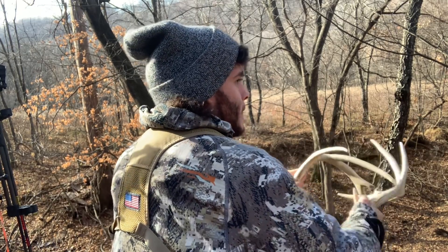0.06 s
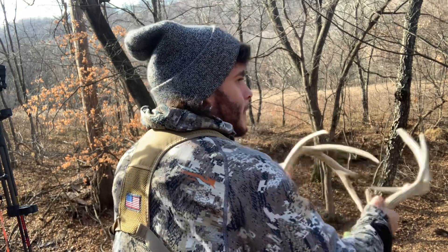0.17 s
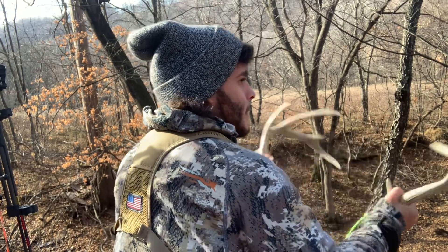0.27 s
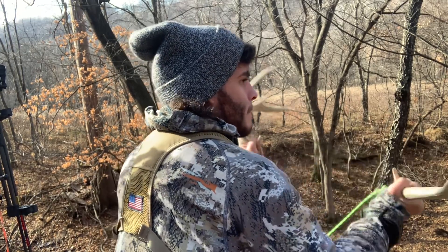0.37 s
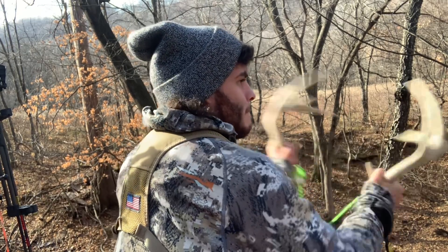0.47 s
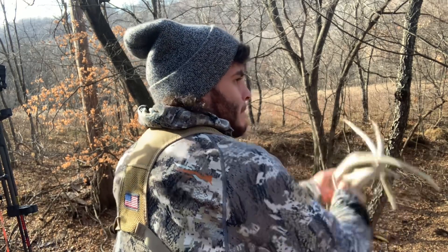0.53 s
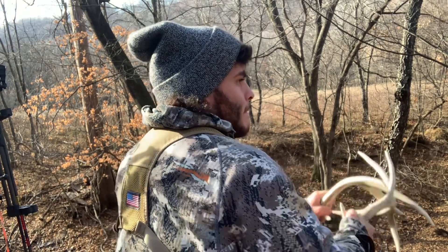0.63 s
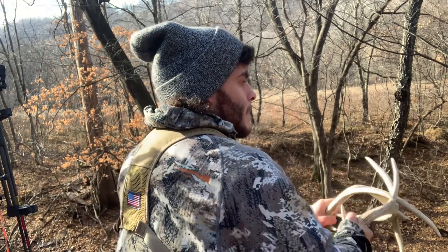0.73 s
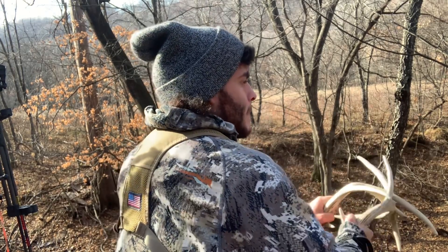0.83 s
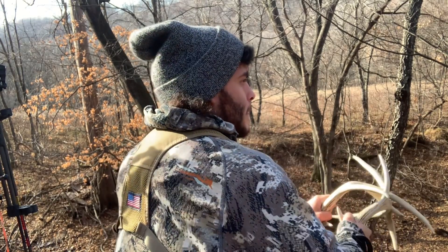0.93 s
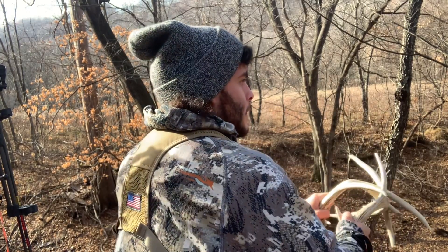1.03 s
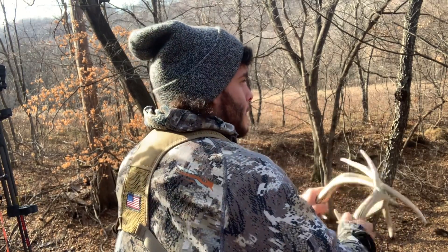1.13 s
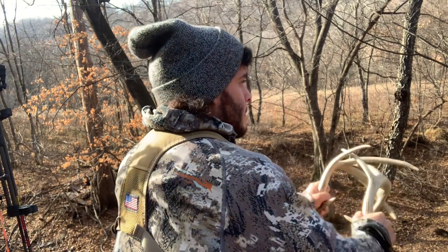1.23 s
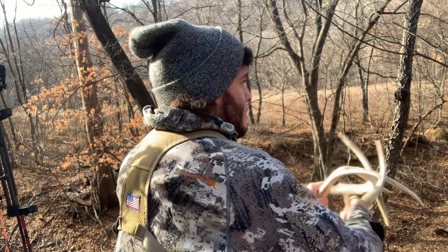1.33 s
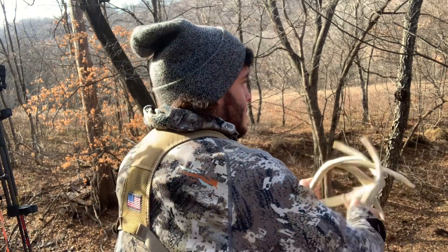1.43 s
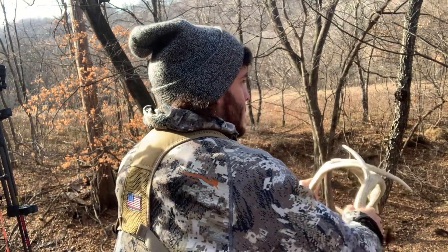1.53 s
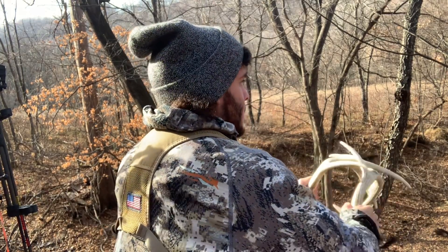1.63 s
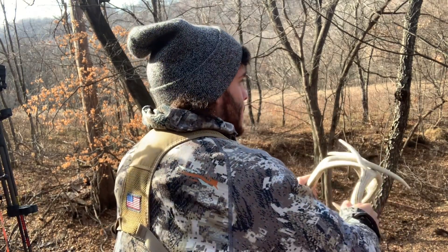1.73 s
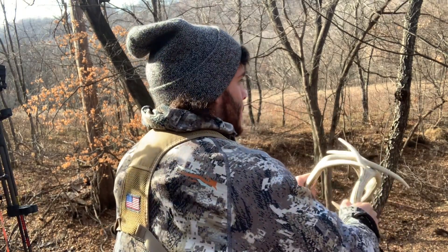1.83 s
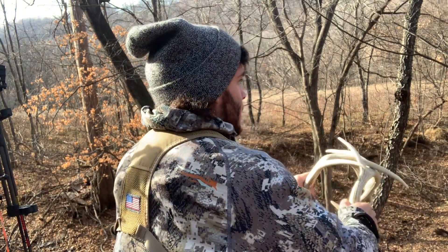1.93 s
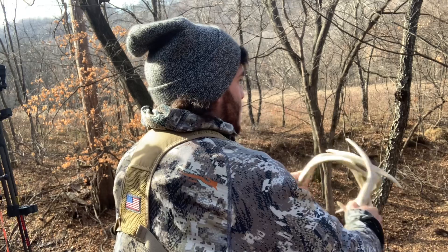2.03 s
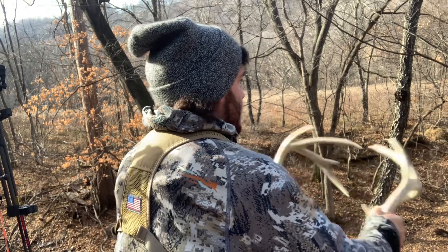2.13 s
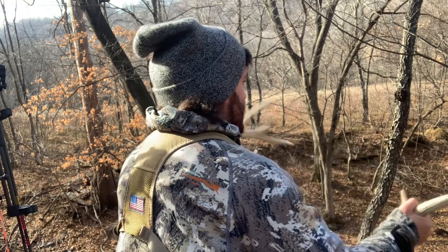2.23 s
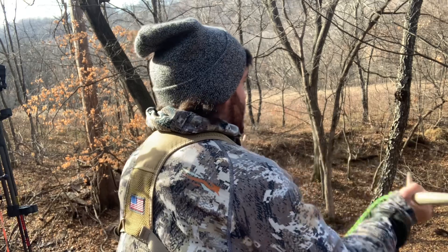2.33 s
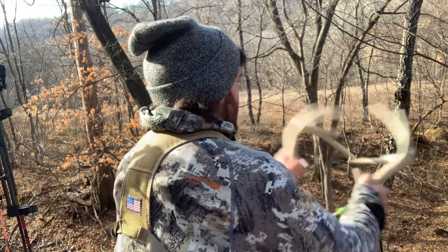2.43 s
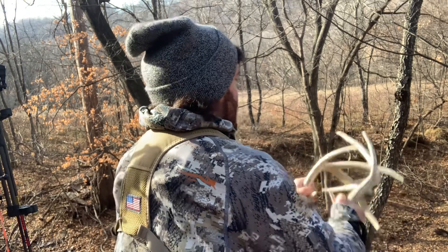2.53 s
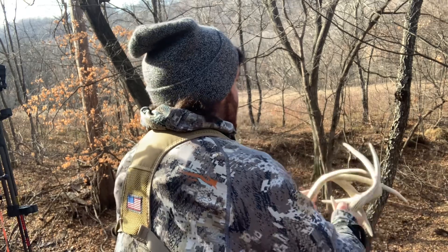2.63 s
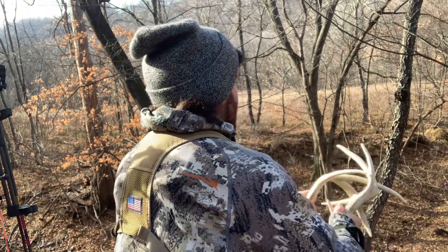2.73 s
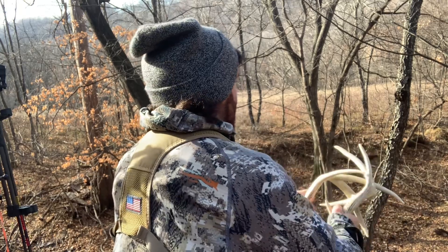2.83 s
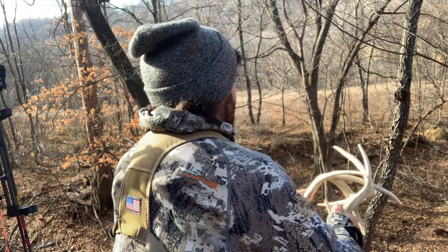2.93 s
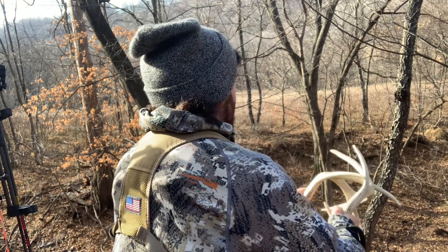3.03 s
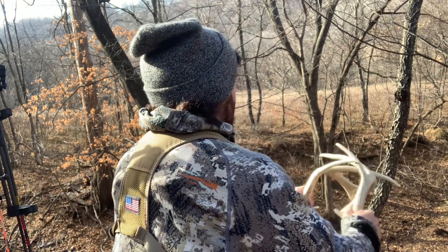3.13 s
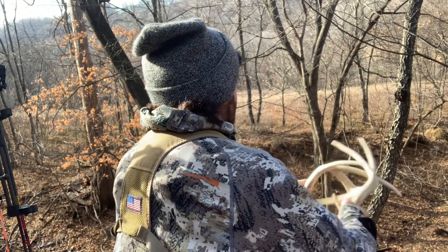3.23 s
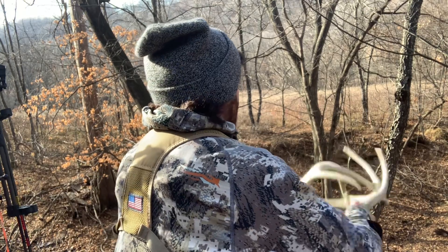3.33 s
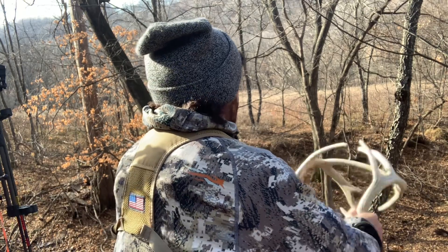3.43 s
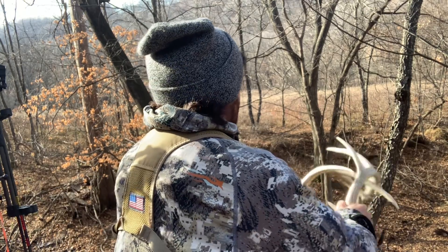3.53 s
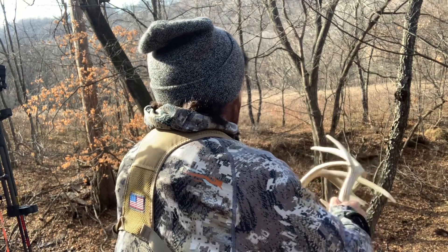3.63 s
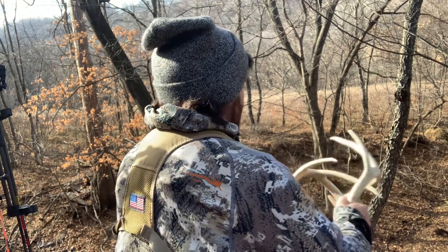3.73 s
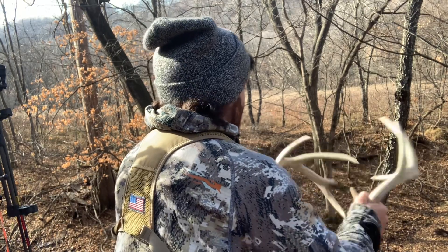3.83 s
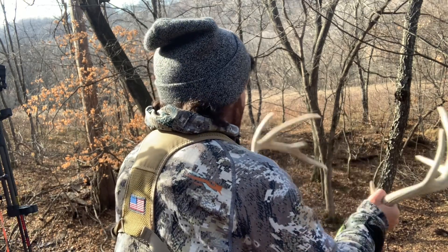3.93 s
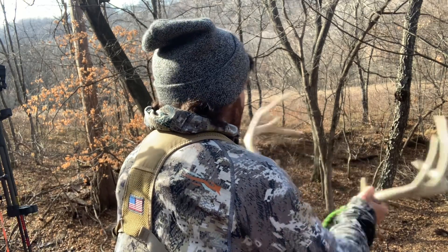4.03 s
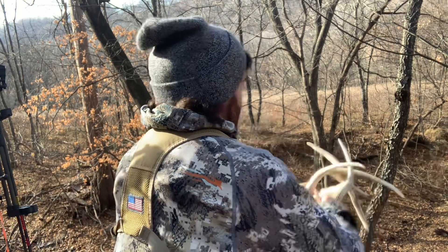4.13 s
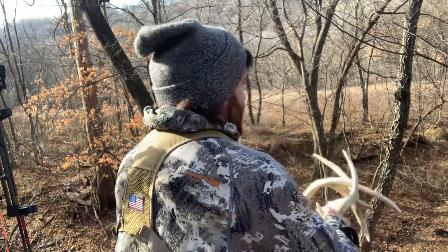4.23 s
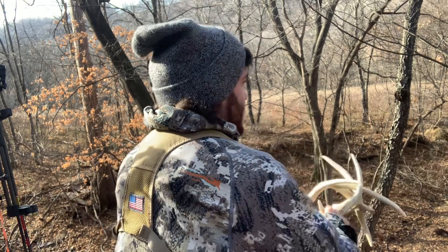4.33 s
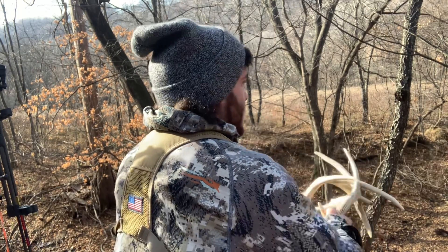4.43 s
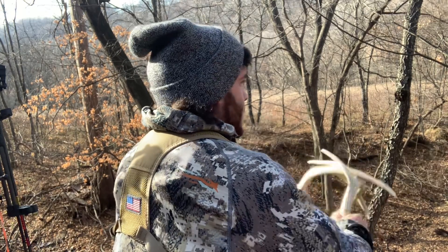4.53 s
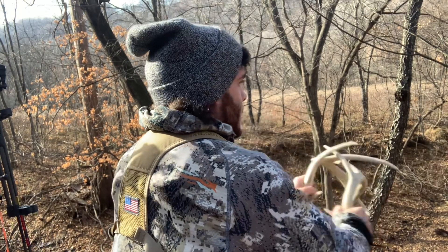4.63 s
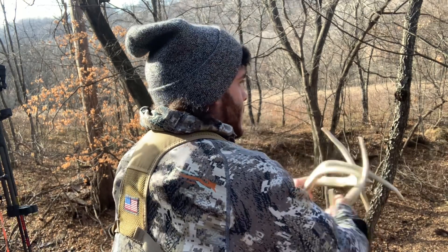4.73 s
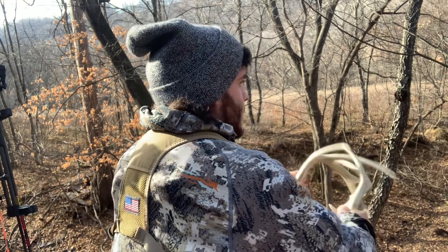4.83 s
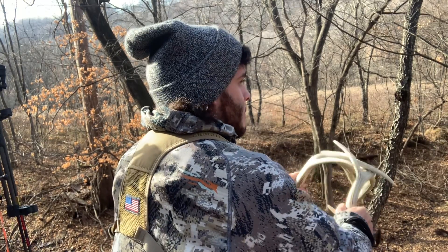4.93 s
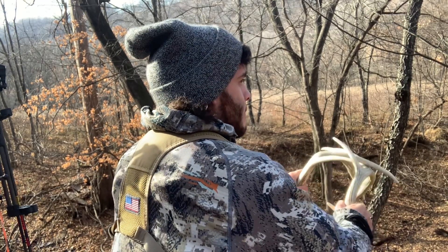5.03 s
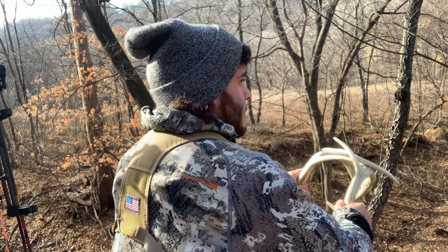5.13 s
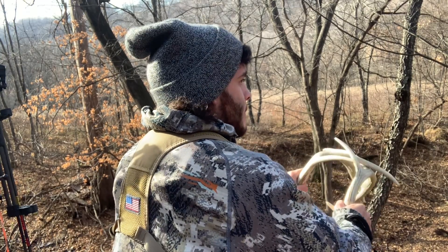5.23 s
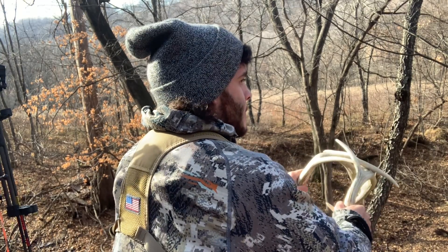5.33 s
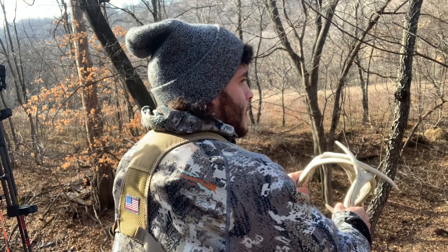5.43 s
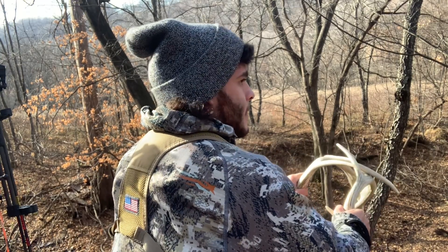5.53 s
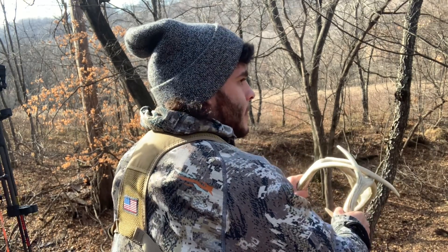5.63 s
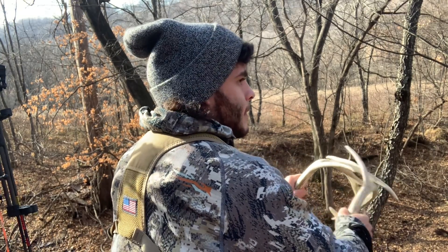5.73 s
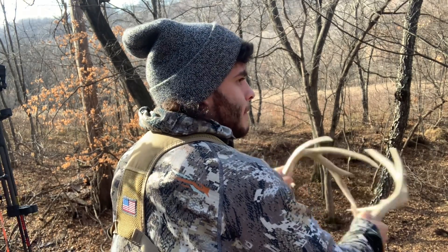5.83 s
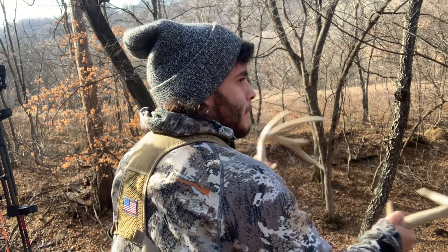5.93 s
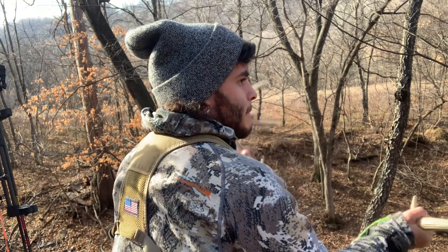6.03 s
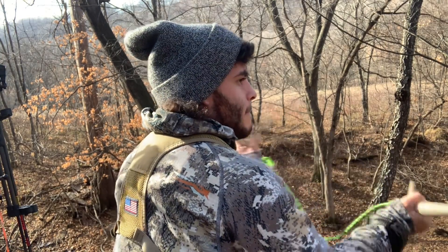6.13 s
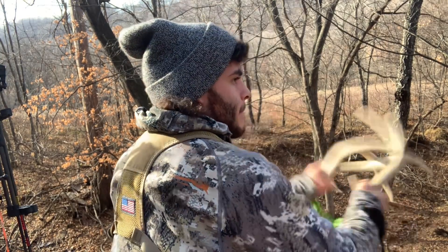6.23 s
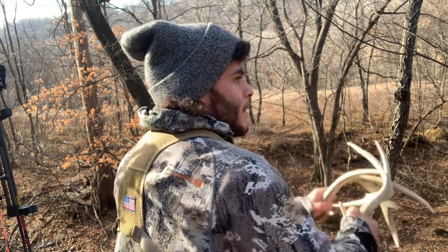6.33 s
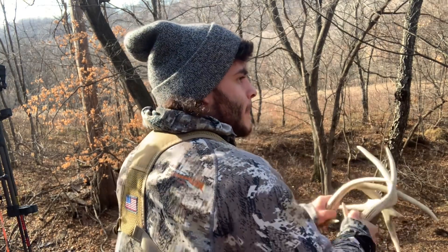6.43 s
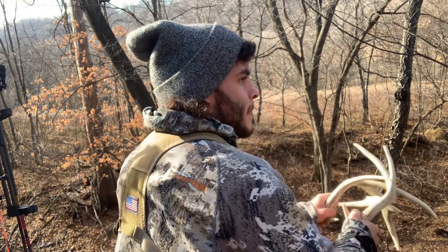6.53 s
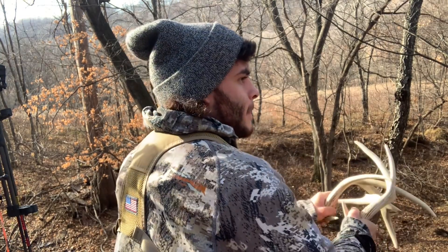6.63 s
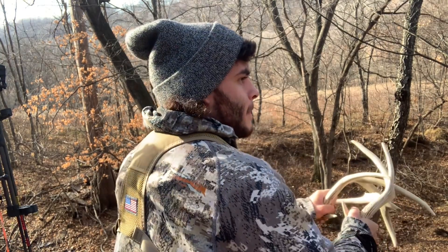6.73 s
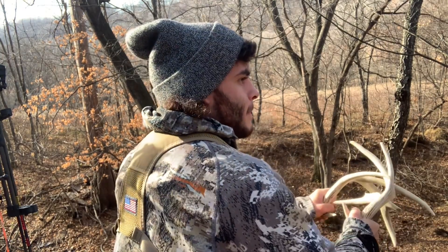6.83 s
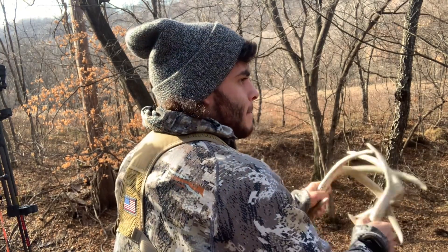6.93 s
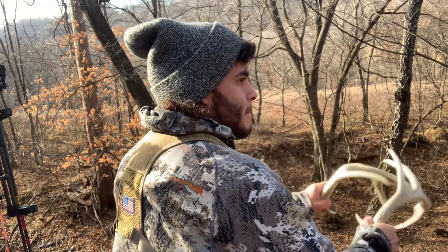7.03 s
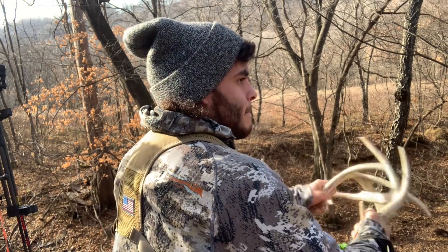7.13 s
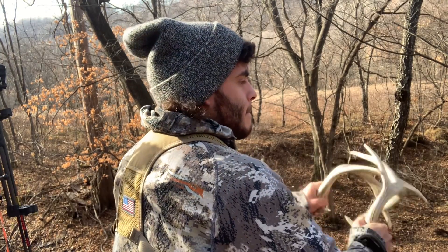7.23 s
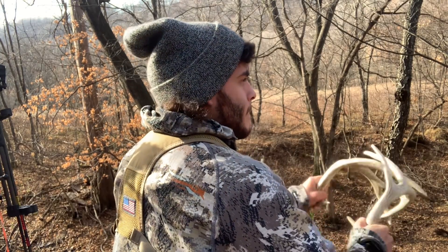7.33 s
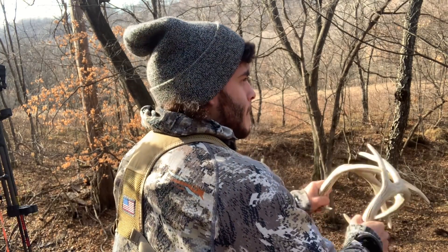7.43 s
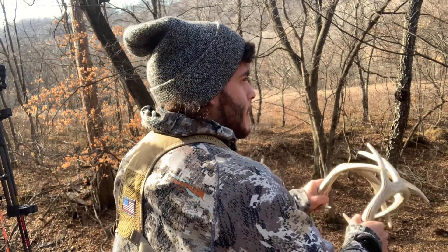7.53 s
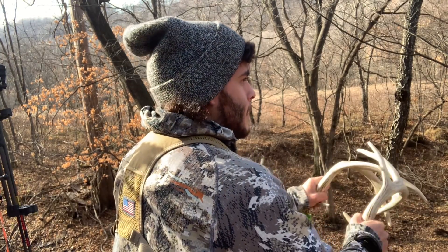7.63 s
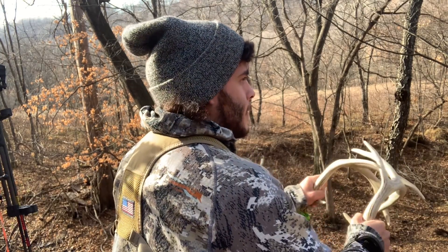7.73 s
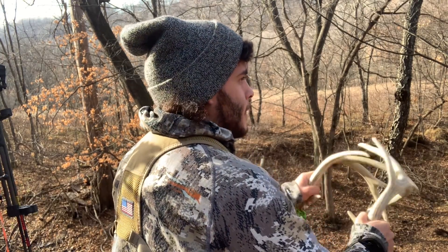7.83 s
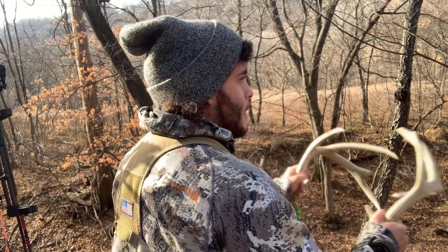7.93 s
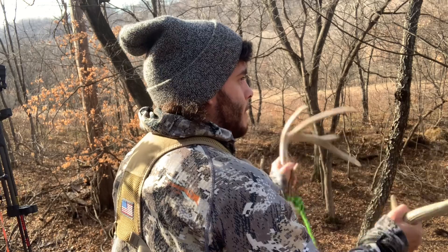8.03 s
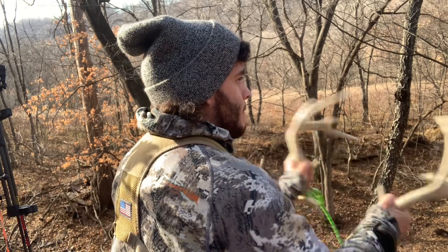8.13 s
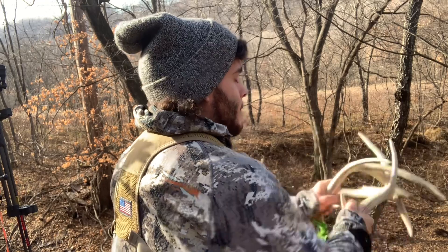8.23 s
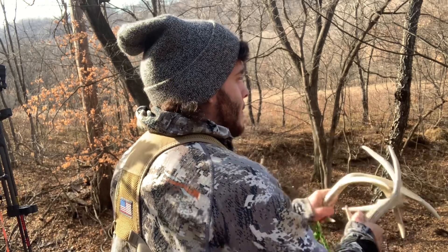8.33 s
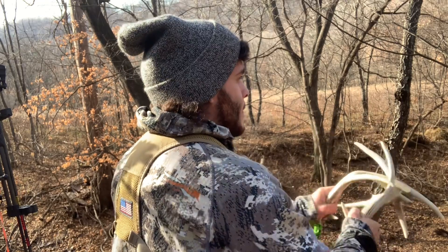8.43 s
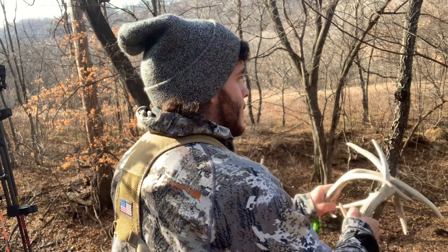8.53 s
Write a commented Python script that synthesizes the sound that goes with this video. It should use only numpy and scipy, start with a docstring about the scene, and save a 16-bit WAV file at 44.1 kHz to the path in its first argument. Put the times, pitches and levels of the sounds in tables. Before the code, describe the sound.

Close up in quiet leafless woods, a pair of deer antlers is clashed five times, about two seconds apart. Each clash is a sudden loud bony crack with a bright click and short hollow body. Between clashes come much softer scattered knocks, ticks and brief scrapes as the tines twist together. A thin grainy echo comes off the trunks, over low wind rumble and faint hiss.

```python
"""Two deer antlers are clashed, then twisted and knocked together, in five bouts in bare woodland.
Before each clash a low noise rises, to fade after it; tips meet, beams crash and boom, forks lock.
Then knocks ring damped beams and tines and skid on rough bone, and tines scrape; the fourth bout has a squeak.
Trunks scatter the clatter back as decaying noise; coloured noise makes the low swells, wind and hiss.
Two close microphone ports behind the hands hear it all, through a limiter."""
import sys
import numpy as np
from scipy import signal
from scipy.fft import rfft, irfft, next_fast_len
from scipy.io import wavfile
from scipy.ndimage import uniform_filter1d, minimum_filter1d

SR = 44100
rng = np.random.default_rng(int(sys.argv[2]) if len(sys.argv) > 2 else 0)


def waveform_to_disk(signal):
    """Save audio, clipped to [-1, 1], as 16-bit WAV at the path in sys.argv[1]."""
    frames = np.transpose(np.atleast_2d(signal))
    scaled = np.clip(frames, -1, 1) * 32767
    samples = np.round(scaled).astype(np.int16)
    wavfile.write(sys.argv[1], SR, samples)


N = 377937  # samples

# bending modes of the two main beams, before detuning: (frequency [Hz], relative level [dB], t60 [s])
BEAM_MODES = [(388, -15, 0.059), (496, -9, 0.043), (757, -14.5, 0.038), (866, -3.5, .08), (1054, -3, .05),
              (1152, 0.5, 0.045), (1307, -5, 0.041), (1421.5, -3, 0.061), (1662, -6, 0.045),
              (1808, -3.5, .04), (1976, -2.5, 0.06), (2120, -1, 0.036), (2420, 0.5, 0.034),
              (2760, -9, 0.046)]
# modes of the short tines, before detuning: (frequency [Hz], relative level [dB], t60 [s])
TINE_MODES = [(3031, -8.5, 0.036), (3255, -3, 0.042), (3630, -1.5, 0.044), (3930, 1.5, 0.027),
              (4395, 2.5, 0.027), (4520, -3, 0.043), (5390, -3.5, 0.032), (5980, -1.5, 0.039),
              (6320, 0.5, 0.05), (7200, -2, 0.023), (7440, -7.5, 0.035), (8100, -10, 0.009),
              (8930, -15, .018)]
# low part of the crack of a contact: (frequency [Hz], relative level [dB])
THUD_COLOUR = [(60, -45.5), (150, -25), (300, -13), (500, -7), (1000, -2), (2000, -3), (2700, -2.5),
               (3300, -21.5), (6000, -59)]
# the full clashes: (time [s], knock level [dB], click level [dB], beam note [Hz], lead of the tips [s],
# tips level [dB], delay of the locking forks [s], boom of the looser antler [Hz], boom level [dB],
# boom t60 [s], extra send to the trees [dB])
CLASH_EVENTS = [(.525, -17.5, -18.5, 1174, 0.032, -25, .008, 493.7, -30.5, 0.11, -3),
                (2.4709, -20, -18, 2148, .0133, -19.5, 0.0026, 286, -43, 0.052, -1.5),
                (4.122, -23.5, -26.5, 1280, 0.011, -26, 0.0057, 376.8, -42, 0.38, 1),
                (6.24, -19, -16.5, 2155, 0.0097, -23, .006, 400, -30.5, 0.044, -15),
                (8.202, -17.5, -17, 2546, 0.013, -19, 0.0041, 351, -33, .055, -5)]

RING = int(.1 * SR)  # samples in one contact
ATTACK = int(.006 * SR)  # samples over which a blow's level is set


def undb(db):
    """Decibels to gain."""
    return 10 ** (np.asarray(db) / 20)


def fade(t, t60):
    """Exponential decay, 60 dB down after t60."""
    return np.exp(-np.log(1000) * t / t60)


def curve(rows, x):
    """Rows (x, value) joined by straight lines."""
    return np.interp(x, *np.transpose(rows))


def on_log_axis(points, hz):
    """Rows (Hz, value) joined on a log-frequency axis."""
    f, value = np.transpose(points)
    return np.interp(np.log(hz + 1), np.log(f), value)


def noise(points, size):
    """Two unrelated channels of coloured noise, rms 1 over both."""
    n = next_fast_len(size)
    gain = undb(on_log_axis(points, np.fft.rfftfreq(n, 1 / SR)))
    y = irfft(rfft(rng.standard_normal((2, n))) * gain, n)[:, :size]
    return y / y.std()


def walk(rate):
    """Slow random drift: random levels, rate per second, joined by ramps."""
    k = int(SR / rate)
    return uniform_filter1d(np.repeat(rng.standard_normal(N // k + 1), k), k)[:N]


def unit(y):
    """Scale a blow to rms 1 over its first milliseconds."""
    return y / np.sqrt(np.mean(y[:, :ATTACK] ** 2))


def add(out, s, y):
    """Mix a sound in at time s."""
    i = int(s * SR)
    out[..., i:i + y.shape[-1]] += y[..., :N - i]


def antlers():
    """All clashes and grinding: as sent towards the microphones, and all round."""
    direct, all_round = np.zeros((2, N)), np.zeros(N)
    for s, near, wide in [*clashes(), *grinding()]:
        add(direct, s, near)
        add(all_round, s, wide)
    return direct, all_round


def clashes():
    """The tips meet first, then the beams crash and boom, then the forks jam together."""
    # boom of the firmly held antler, alike in every clash: (frequency [Hz], level [dB], t60 [s])
    firm_boom = (600, -39, 0.12)
    tips_knock_db, tips_hz = -4, 2090  # the light tips click more than they knock
    lock_db, lock_hz = -4, 1915  # level against the main blow
    t = np.arange(SR // 2) / SR
    for (s, knock_db, click_db, beam_hz, lead_s, tips_db, lock_s,
         boom_hz, boom_db, boom_t60, trees_db) in CLASH_EVENTS:
        yield strike(s - lead_s, tips_db + tips_knock_db, tips_db, tips_hz, trees_db)
        yield strike(s, knock_db, click_db, beam_hz, trees_db)
        yield strike(s + lock_s, knock_db + lock_db, click_db + lock_db, lock_hz, trees_db)
        boom = sum(undb(db) * np.sin(2 * np.pi * hz * t) * fade(t, t60)
                   for hz, db, t60 in [(boom_hz, boom_db, boom_t60), firm_boom])
        yield s, boom * (1 - np.exp(-t / .0014)), np.zeros_like(boom)


def grinding():
    """Around the clashes the twisted, locked tines knock and slide along each other."""
    # single knocks: (time [s], knock level [dB], click level [dB], beam note [Hz])
    knocks = [(0.516, -20.5, -18.5, 1415), (.563, -41, -37, 1904), (.603, -35.5, -43.5, 1165),
              (0.694, -48.5, -59, 1670), (1.139, -45.5, -52.5, 1216), (1.156, -44.5, -50.5, 2660),
              (1.183, -36, -36.5, 1080), (1.229, -49, -56, 2540), (1.313, -36.5, -44, 2666),
              (1.386, -39, -46.5, 1140), (1.452, -38, -36.5, 1129), (1.47, -44, -43, 783),
              (1.483, -41.5, -44.5, 1203), (1.668, -66, -80, 2330), (2.003, -58.5, -72, 1690),
              (2.095, -48, -46, 2319), (2.448, -32, -31.5, 732), (2.503, -37, -30.5, 1129),
              (2.57, -41, -48, 800), (2.651, -36.5, -44, 1935), (2.671, -40, -52.5, 2635),
              (3.054, -62.5, -69, 1600), (3.1192, -31.5, -25, 2177), (3.216, -45, -58, 1923),
              (3.358, -57.5, -50.5, 840), (3.414, -51, -62.5, 1136), (3.502, -47.5, -49, 1421),
              (3.54, -34.5, -33.5, 2650), (3.616, -43, -48, 2655), (4.241, -34, -43, 1787),
              (4.279, -43, -55.5, 2430), (4.512, -41, -52.5, 1936), (4.527, -40, -47.5, 2725),
              (4.553, -36, -37, 2800), (4.682, -35, -43.5, 2510), (4.715, -35.5, -39, 1450),
              (4.811, -32.5, -41, 1180), (4.837, -31, -28, 1248), (4.867, -28.5, -24, 1414),
              (5.018, -56, -67, 2310), (5.798, -49.5, -44.5, 1448), (6.274, -38, -40.5, 856),
              (6.321, -42, -42.5, 1072), (6.328, -39, -41.5, 875), (6.905, -38.5, -44.5, 1987),
              (6.917, -35.5, -40.5, 1065), (7.002, -52.5, -53.5, 1400), (7.058, -40.5, -42.5, 1100),
              (7.079, -44.5, -51.5, 1213), (7.162, -44, -56, 1214), (7.182, -35, -31.5, 904),
              (7.205, -42.5, -55.5, 733), (7.278, -49, -47.5, 1090), (7.364, -46.5, -51, 1152),
              (8.287, -36.5, -42, 1178), (8.35, -52, -61, 938), (8.483, -56.5, -72, 1400)]
    # sliding strokes: (start [s], length [s], level before the port and tree stages [dB], centre [Hz])
    strokes = [(1.123, 0.049, -49, 1400), (1.39, 0.042, -47, 1190), (2.021, 0.067, -52.5, 2902),
               (3.099, 0.024, -41.5, 1508), (3.313, 0.051, -52, 1210), (3.646, .03, -57, 1080),
               (4.504, 0.068, -41, 2300), (5.747, 0.059, -55, 2713), (6.884, 0.074, -46, 995),
               (7.063, 0.045, -51.5, 1145), (7.808, 0.051, -67, 2175)]
    for row in knocks:
        yield strike(*row)
    for s, length, db, centre_hz in strokes:
        y = undb(db) * scrape(length, centre_hz)
        yield s, y, y[0]


def strike(s, knock_db, click_db, beam_hz, trees_db=0):
    """A contact in the present stretch: (time, sound towards the microphones, sound all round)."""
    near, wide = contact(knock_db, click_db, beam_hz, stretch_at(s)[0])
    return s, near, undb(trees_db) * wide


def stretch_at(s):
    """Tine note, left minus right and high-treble level of the stretch in force at time s."""
    # how the clatter sounds, until the next stretch: (start [s], note of the touching tine [Hz],
    # left minus right [dB], high-treble level of the clatter and its echo [dB])
    stretches = [(0, 4385, 6, 0.5), (1, 6370, 2.1, 4), (1.9, 6500, 7, 1), (2.499, 6470, 5, 3.5),
                 (3.3, 3400, 1.5, 6), (4, 3340, 4, -7.5), (4.4, 4335, 6.5, -2.5), (5.7, 4520, 10.5, 2),
                 (6.3, 6140, 1.5, 15), (7.15, 6150, 2, 15.5), (7.999, 4340, 7, 2.5), (8.27, 6520, -2.5, 10)]
    start, *columns = np.transpose(stretches)
    return np.array(columns)[:, np.maximum(np.searchsorted(start, s, side="right") - 1, 0)]


def contact(knock_db, click_db, beam_hz, tine_hz):
    """A woody knock of the beams and a sharp click of the tines, each led by the note of the part hit."""
    # high part of the crack: (frequency [Hz], relative level [dB])
    snap_colour = [(1500, -50), (2400, -14.5), (2900, -0.5), (4400, 1), (5200, 0.5), (6600, 2), (7800, -8),
                   (9000, -21), (10000, -30), (11000, -42.5), (15000, -38.5)]
    t = np.arange(RING) / SR
    # hard blows crack more and skid less
    force = np.clip((knock_db + 38.5) / 22, 0, 1)
    beam_note = ring([(beam_hz, 0, .045)], scatter_db=0, apart=0)
    tine_note = ring([(tine_hz, 0, .016)], scatter_db=0, apart=0)
    thud = crack(THUD_COLOUR, t60=0.04, apart=0.16)
    snap = crack(snap_colour, t60=0.02, apart=0.67)
    # a short, hard contact favours the upper modes
    beam = [(hz, db + 1.2 * force * np.log2(hz / 1400), t60) for hz, db, t60 in BEAM_MODES]
    knock = ring(beam, scatter_db=3.0, apart=0.49)
    knock = knock + undb(0.5 - 3.5 * force) * beam_note + undb(-5.5 + 3.4 * force) * thud
    click = ring(TINE_MODES, scatter_db=0.5, apart=0.41)
    click = click + undb(-1.5) * tine_note + undb(3.5) * snap
    # bone takes a moment to get moving: time constants in s
    knock = knock * (1 - np.exp(-t / 0.0007))
    click = click * (1 - np.exp(-t / 0.00088))
    knock = unit(skid(knock, size_db=-5.5 - 12 * force, t60=0.099, count=4))
    click = unit(skid(click, size_db=-15.0 - 4.9 * force, t60=0.33, count=4))
    near = undb(knock_db) * knock + undb(click_db) * click
    # taken over all directions, single modes stand out less
    cracks = undb(knock_db) * thud[1] + undb(click_db) * snap[1]
    return near, .45 * near[0] + 0.84 * cracks


def ring(modes, scatter_db, apart):
    """Modes struck at a random spot: it sets their shares, the grip detunes them, the ports differ a little."""
    hz, db, t60 = np.transpose(modes)
    t = np.arange(RING) / SR
    spot, grip = rng.standard_normal((2, len(hz)))
    phase = 2 * np.pi * rng.random(len(hz))
    detuned = hz * (1 + 0.013 * grip)
    waves = np.sin(2 * np.pi * detuned[:, None] * t + phase[:, None]) * fade(t, t60[:, None])
    port_shares = 1 + apart * rng.standard_normal((2, len(hz)))
    return unit((undb(db + scatter_db * spot) * port_shares) @ waves)


def crack(colour, t60, apart):
    """The dense, quickly damped modes of porous bone, as fading coloured noise."""
    shared, own = noise(colour, RING)
    return unit((shared + apart * np.array([own, -own])) * fade(np.arange(RING) / SR, t60))


def skid(blow, size_db, t60, count):
    """The surfaces slide on: small catches on the ridges repeat the blow, later ones weaker on average."""
    at = 0.0027 + rng.exponential(.012, count)
    sizes = undb(size_db + 2.4 * rng.standard_normal(count)) * fade(at, t60)
    out = blow.copy()
    for lag, size in zip(np.clip(at * SR, 1, RING - 1).astype(int), sizes):
        out[:, lag:] += size * blow[:, :-lag]
    return out


def scrape(length, centre_hz, catches_per_s=700, uneven_db=5, narrow_db=9, swell_db=15):
    """Ridged bone slides on bone: a swelling run of tiny catches rings the beams and tines."""
    size = int(length * SR)
    happens = rng.random(size) < catches_per_s / SR
    catches = happens * undb(uneven_db * rng.standard_normal(size)) * rng.choice([-1, 1], size)
    swell = undb(np.linspace(-swell_db, 0, size))
    body = ring(BEAM_MODES, scatter_db=2.5, apart=0.19) + ring(TINE_MODES, scatter_db=-1.0, apart=.3)
    body = body + crack(THUD_COLOUR, t60=0.024, apart=.3)
    y = signal.fftconvolve((catches * swell)[None], body, axes=1)
    # narrow the sound around its centre
    octaves = np.log2((np.fft.rfftfreq(y.shape[1], 1 / SR) + 1) / centre_hz)
    cut_db = narrow_db * np.minimum(octaves ** 2, 2 * np.abs(octaves))
    y = irfft(rfft(y) * undb(-cut_db), y.shape[1])
    return y / np.sqrt(np.sum(y ** 2) / size)


def creak(start=6.878, length=0.035, from_hz=510, to_hz=650, level_db=-45):
    """Locked tines stick and slip as they are twisted: a short, unsteady rising squeak of five harmonics."""
    u = np.clip((np.arange(N) / SR - start) / length, 0, 1)
    hz = (from_hz + (to_hz - from_hz) * u) * (1 + 0.0195 * walk(550))
    phase = 2 * np.pi * np.cumsum(hz) / SR
    swell = u * np.sqrt(np.abs(np.sin(np.pi * u)))
    return undb(level_db) * swell * sum(np.sin(k * phase) / k for k in range(1, 6))


def ports(x):
    """The two ports hear the hands with a phase lag between them and each with its own colour."""
    # phase by which the left port trails the right, before smoothing: (frequency [Hz], phase [rad])
    port_phase = [(0, 4), (300, 1.3), (650, 1.7), (1450, 0.98), (2000, 2.3), (3000, 1.2), (4000, 5),
                  (6300, 4), (8000, 12), (16000, 20)]
    # left minus right colour, before smoothing: (frequency [Hz], level difference [dB])
    port_tilt = [(200, -1.5), (600, -1), (1100, -7), (1600, 6.5), (2500, 1), (4400, 0), (6100, -2),
                 (7200, -1.5), (8300, 9.5), (11000, -1.5)]
    n = next_fast_len(N + RING)
    hz = np.fft.rfftfreq(n, 1 / SR)
    width = int(300 * n / SR)  # smooth over 300 Hz
    tilt_db = uniform_filter1d(on_log_axis(port_tilt, hz), width)
    phase = uniform_filter1d(curve(port_phase, hz), width)
    tilt = undb(np.array([tilt_db, -tilt_db]) / 2)
    tilt = tilt / np.sqrt(np.mean(tilt ** 2, axis=0))  # keep the mean power
    lag = np.exp(-1j * np.array([[1], [0]]) * phase)
    return irfft(rfft(x, n) * lag * tilt, n)[:, :N]


def woods(x, level_db=-15, pan_db=4, build_s=0.0061, patchy_db=3.5):
    """Echoes of countless trunks: a thin, grainy tail that lasts longest in the upper middle."""
    # sound scattered by the trunks: (band centre [Hz], relative level [dB], t60 [s])
    trunk_bands = [(250, -15.5, .3), (500, -8.5, 0.16), (1000, -3, .45), (1900, -7.5, 0.79),
                   (3320, 0.5, 0.71), (5500, -2.5, 0.5), (7200, 5, 0.2), (10800, -7.5, 0.16)]
    t = np.arange(SR) / SR
    hz = np.fft.rfftfreq(SR, 1 / SR)
    centres, db, t60 = np.transpose(trunk_bands)
    echoes = rfft(rng.standard_normal((2, SR)) * undb(patchy_db * walk(130)[:SR]))
    response = 0
    for share, band_db, band_t60 in zip(np.eye(len(centres)), db, t60):
        band = irfft(echoes * on_log_axis(np.c_[centres, share], hz), SR)
        response = response + undb(band_db) * band * fade(t, band_t60)
    response = response * (1 - np.exp(-t / build_s)) / np.sqrt(SR / 20)
    sides = undb(level_db + np.array([[pan_db], [-pan_db]]) / 2)
    return sides * signal.fftconvolve(x[None], response, axes=1)[:, :N]


def swell_level(t):
    """Each swell rises quickly, holds until its clash and fades after; the strongest one counts."""
    # one swell for each clash: (start [s], relative level [dB], fading after the clash [dB/s])
    noise_swells = [(.13, -61, 18), (1.86, -61, 7.5), (3.87, -61.5, 6), (5.26, -61.5, 93),
                    (7.66, -62.5, 10.5)]
    rise_s, rest_db = 0.061, -78.5
    swells = []
    for (start, db, db_per_s), clash in zip(noise_swells, CLASH_EVENTS):
        rise = np.clip((t - start) / rise_s, 0, 1)
        swells.append(rise * undb(db - db_per_s * np.maximum(t - clash[0], 0)))
    return np.maximum(np.max(swells, axis=0), undb(rest_db))


def low_noise(swell):
    """A low background noise that rises before each clash, holds until it and fades after."""
    # colour of the low noise: (frequency [Hz], relative level [dB])
    low_colour = [(25, -16), (60, 3.5), (290, -4), (420, -6), (600, -16), (1000, -26.5), (12000, -73)]
    shared, own = noise(low_colour, N)
    return (shared + .7 * np.array([own, -own])) * swell * undb(-4.0 + 0.5 * walk(32))


def wind(t, swell):
    """Air bumps the ports: a rumble from gusts, a part that follows the low noise and a steady breeze."""
    # puffs of air: (time [s], half length [s], relative level [dB])
    puffs = [(.92, 0.15, -64.5), (2.63, .1, -63), (3.99, 0.084, -60.5), (6.13, 0.18, -58), (6.5, .22, -64),
             (8.47, .11, -66)]
    # colour of the bumping air: (frequency [Hz], relative level [dB])
    rumble_colour = [(15, -25), (30, -10), (47, 2.5), (65, -2), (110, -18), (1500, -93.5)]
    breeze_db, follow_db = -80.5, -11  # follow_db is set against the swell level
    gusts = sum(undb(db) * np.exp(-((t - s) / half) ** 2) for s, half, db in puffs)
    air = np.sqrt(gusts ** 2 + (undb(follow_db) * swell) ** 2 + undb(breeze_db) ** 2)
    shared, own = noise(rumble_colour, N)
    return (shared + .7 * np.array([own, -own])) * air * undb(1.8 * walk(9))


def background():
    """Low noise and wind over the steady noise of still air and microphone hiss."""
    # still air and hiss: (frequency [Hz], relative level [dB])
    hiss_colour = [(20, -5), (50, -3), (130, -9), (900, -20.5), (1350, -19.5), (1600, -16.5), (2100, -24.5),
                   (7000, -28.5), (9500, -40.5), (12500, -32), (15000, -50)]
    hiss_db = -74.5
    t = np.arange(N) / SR
    swell = swell_level(t)
    return low_noise(swell) + wind(t, swell) + undb(hiss_db) * noise(hiss_colour, N)


def scene():
    """The antlers close by, their echo in the trees, the quiet around them."""
    trees_db, treble_hz, top_cut_hz = 1.36, 8050, 9870  # trees_db: gain of the send to the trunks
    # glide between stretches over 1500 samples
    _, pan_db, treble_db = uniform_filter1d(stretch_at(np.arange(N) / SR), size=1500, axis=1)
    sides = undb(np.array([pan_db, -pan_db]) / 2)
    sides = sides / np.sqrt(np.mean(sides ** 2, axis=0))
    direct, all_round = antlers()
    near = ports((direct + creak()) * sides)
    rattle = near + woods(all_round * undb(trees_db))
    # the high treble of the clatter and its echo changes from stretch to stretch
    high_pass = signal.butter(4, treble_hz, "high", fs=SR, output="sos")
    treble = signal.sosfiltfilt(high_pass, rattle)
    rattle = rattle + (undb(treble_db) - 1) * treble
    # a steep cut above about 10 kHz takes the very top off the clatter and its echo
    top = signal.ellip(4, .3, 22, top_cut_hz, fs=SR, output="sos")
    return signal.sosfilt(top, rattle) + background()


def record(dry, bend=0.098, top_hz=15500):
    """A limiter holds the peaks just under full scale, a cubic bends them slightly, a low-pass cuts the top."""
    room_left = 1 / np.maximum(np.abs(dry).max(axis=0) / .95, 1)
    held = dry * uniform_filter1d(minimum_filter1d(room_left, size=89), size=89)  # about 2 ms
    low_pass = signal.ellip(8, .2, 70, top_hz, fs=SR, output="sos")
    return signal.sosfilt(low_pass, held - bend * held ** 3)


dry = scene()
out = record(dry)
waveform_to_disk(out)
```